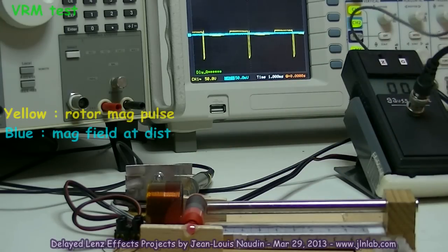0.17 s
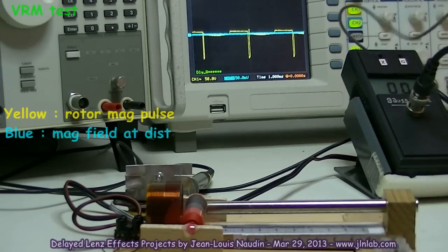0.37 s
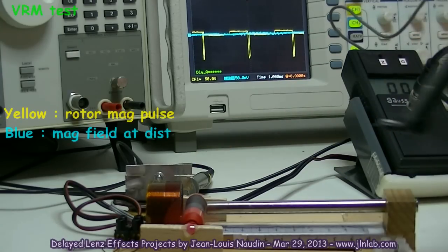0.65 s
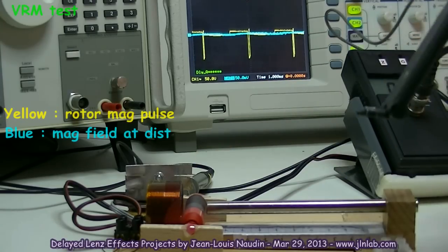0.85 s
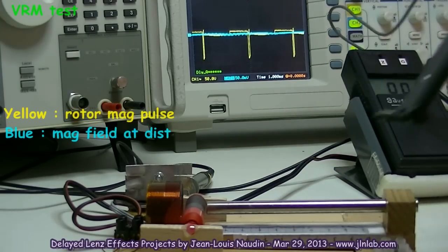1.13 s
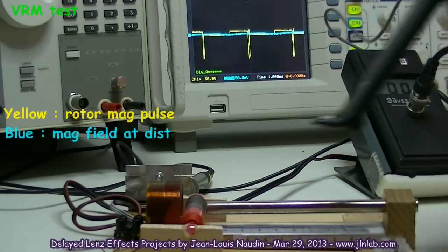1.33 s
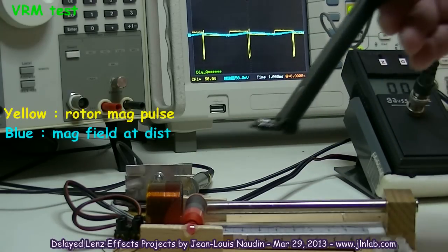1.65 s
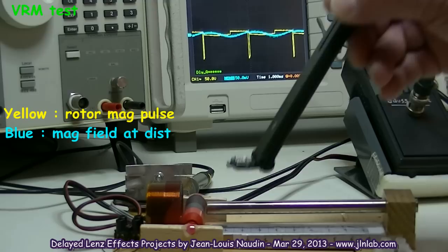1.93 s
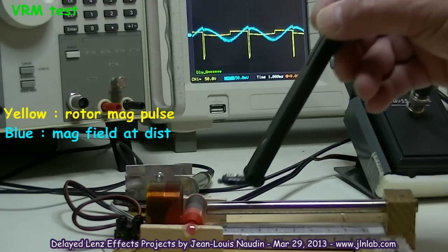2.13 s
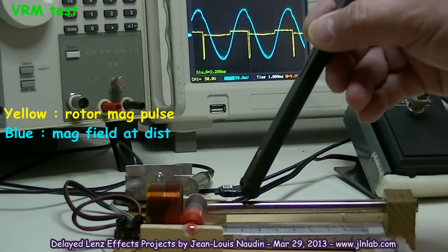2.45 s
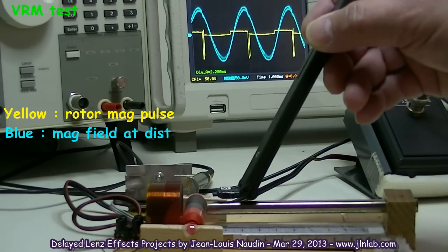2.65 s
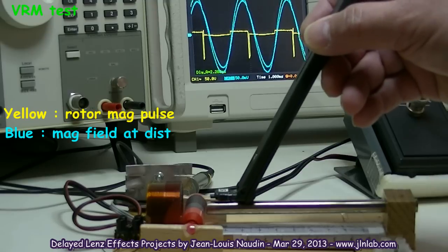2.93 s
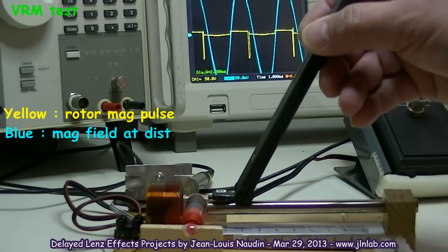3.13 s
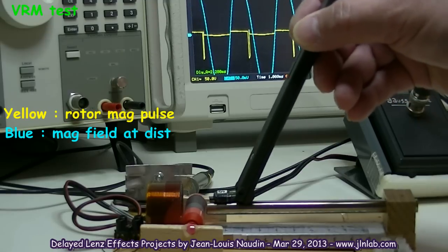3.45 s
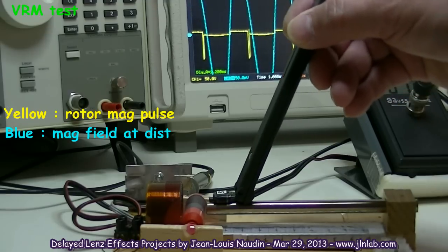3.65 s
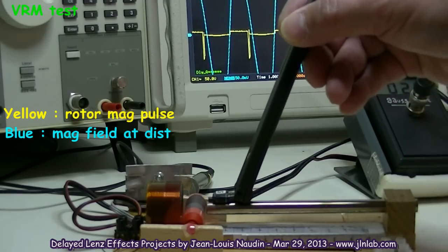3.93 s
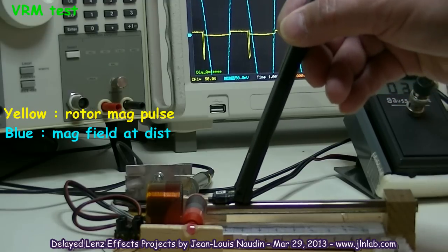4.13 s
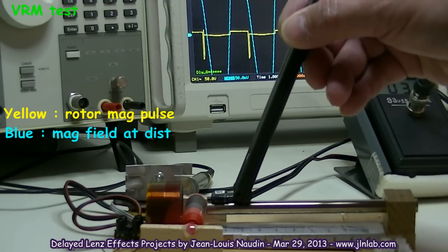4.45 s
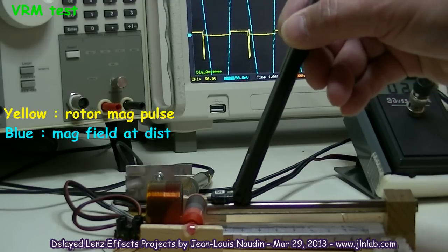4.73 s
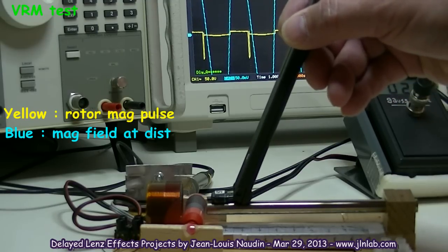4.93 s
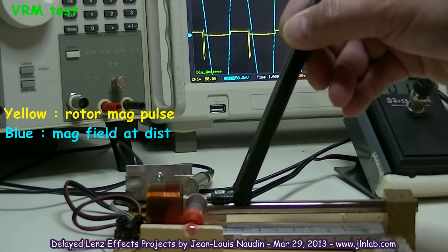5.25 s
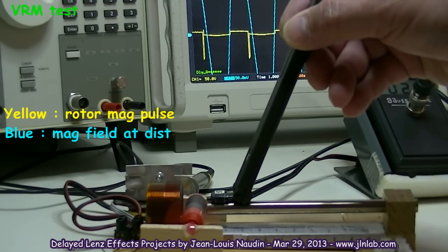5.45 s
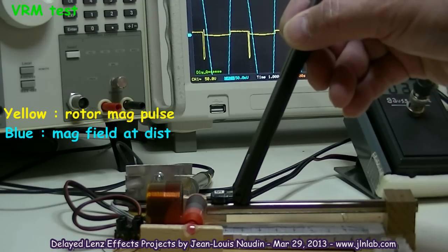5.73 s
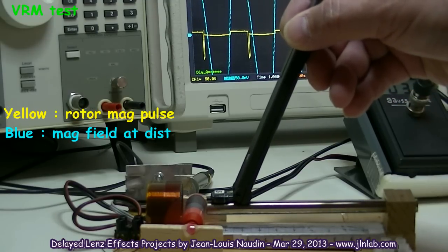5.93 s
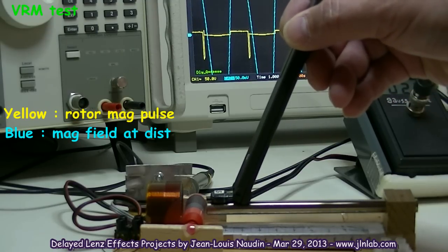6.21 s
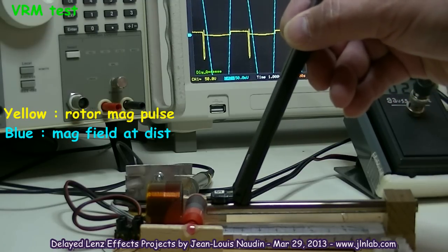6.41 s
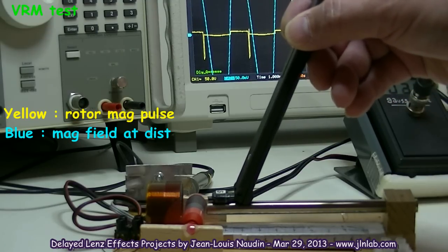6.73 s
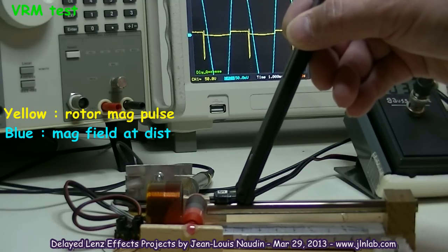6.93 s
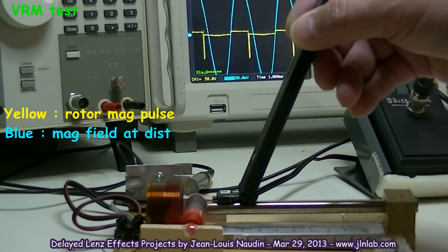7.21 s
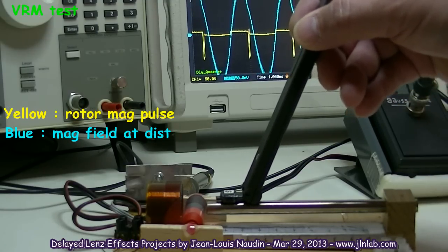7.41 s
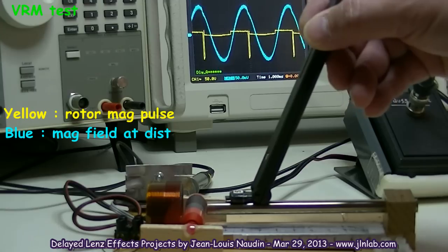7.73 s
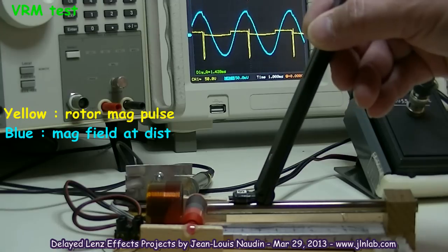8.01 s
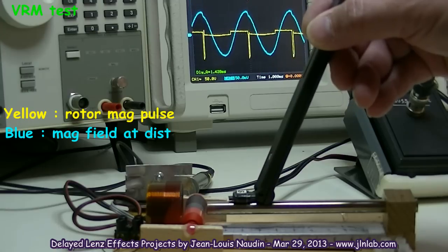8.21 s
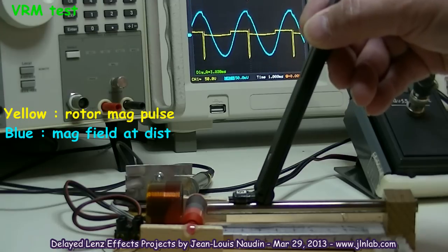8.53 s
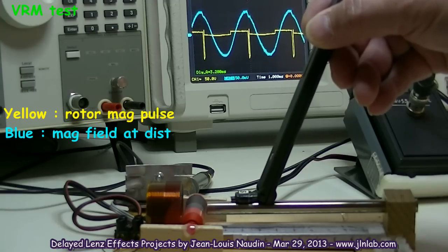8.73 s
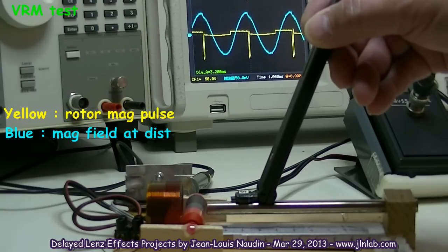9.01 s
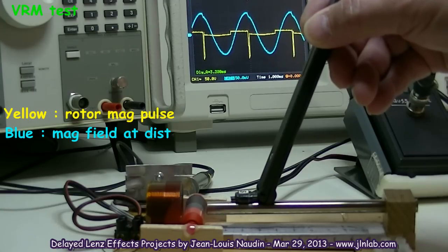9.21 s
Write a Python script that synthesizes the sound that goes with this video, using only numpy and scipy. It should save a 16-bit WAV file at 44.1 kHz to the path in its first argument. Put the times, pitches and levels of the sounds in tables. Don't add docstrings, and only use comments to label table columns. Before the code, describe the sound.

A tiny rotor spins very fast on a workbench, already running from the start, giving a steady nasal whine full of bright buzzing overtones over airy hiss. Around three seconds a hand-held probe touches a metal rail with a hard squeaky clack and two or three short chattering taps. The whine then continues, its tone shifting slightly until the end. Close microphone, dry indoor sound, nearly centred.

```python
import sys
import numpy as np
from scipy import signal
from scipy.fft import rfft, irfft, next_fast_len
from scipy.io import wavfile
from scipy.ndimage import uniform_filter1d

SR = 44100
rng = np.random.default_rng(int(sys.argv[2]) if len(sys.argv) > 2 else 0)


def pcm_store(signal):
    levels = np.round(np.clip(np.atleast_2d(signal), -1, 1) * 32767)
    wavfile.write(sys.argv[1], SR, levels.astype(np.int16).T)


def ratio(d):
    e = np.asarray(d, float) / 20
    return 10 ** e


N = 412776
T = np.arange(N) / SR
SLOW = T[::64]

# start_s, turns_per_s [Hz]
SHAFT_SPEED = [(0.1, 207.1), (2.39, 207.8), (3.08, 207.3), (3.13, 207.7), (4.51, 207.9), (4.61, 207.4),
               (5.09, 208.1), (5.4, 207.5), (5.71, 208.6), (6.29, 208.1), (6.4, 208.7), (7.92, 208.3),
               (8.15, 208.9), (8.28, 208.0), (8.58, 208.7), (9.25, 208.6)]


def shaft_angle(hunt_hz=0.1, hunt_per_s=7):
    speed_hz = curve(SHAFT_SPEED, T) + hunt_hz * walk(hunt_per_s)
    return 2 * np.pi * np.cumsum(speed_hz) / SR


def rotor(turn, top_order=64):
    phase_scatter, sway_rad = 0.085, 0.01
    plank_hz, plank_width_hz = 1500, 150
    orders = np.arange(1, top_order + 1)
    hz = orders * np.mean(curve(SHAFT_SPEED, SLOW))
    lead = np.where(orders < 15, 1.11 - 0.18 * orders, 0.07)
    scatter = phase_scatter * rng.standard_normal(top_order) * (orders > 14)
    phase = 2 * np.pi * (np.cumsum(lead) - lead + scatter)
    phase -= np.arctan(2 * (hz - plank_hz) / plank_width_hz)
    size = np.sqrt(2) * ratio(order_levels(hz))
    step = np.exp(1j * (turn + sway_rad * walk(30)))
    power = np.ones(N, complex)
    out = np.zeros(N)
    for k in range(top_order):
        power = power * step
        out -= np.interp(T, SLOW, size[k]) * (power * np.exp(1j * phase[k])).real
    return out


# start_s, level_db [dB]
KNOCK = [(0.0, -43.5), (0.8, -43), (0.88, -44.5), (1.17, -43), (1.25, -45), (2.61, -42.5), (2.66, -44.5),
         (2.82, -43), (3.02, -44), (4.04, -44), (6.78, -42), (7.4, -43.5), (8.13, -41.5), (8.26, -43),
         (8.99, -41.5), (9.36, -41.5)]


def order_levels(hz):
    knock_db = curve(KNOCK, SLOW)
    db = bearing_orders(hz)
    db[10:] += knock_db
    db[:10] += np.mean(knock_db)
    return rail_bends(db)


# start_s, seat [0-3, beyond 3 is held at 3]
SETTLING = [(0, 0.5), (.88, 1.3), (1.42, 1.05), (2.0, 1.5), (2.15, 1.83), (4.15, 2), (5.45, 2.5), (6.37, 5),
            (8.22, 2.7), (8.45, 6)]
JUMP_S = 0.033
# order, then level_db above the knock [dB] in seats 0, 1, 2 and 3
SEATS = [(5, -21, -16.5, -21, -17.5), (6, -11, -11.5, -10, -11.5), (7, -5.5, -6.5, -8.5, -5.5),
         (8, -10, -14, -18.5, -17.5), (9, -14, -25, -26, -24), (10, -31, -19, -19.5, -21),
         (11, -19, -11.5, -19, -40), (12, -14.5, -13.5, -13.5, -15.5), (13, -19, -17, -13.5, -20.5),
         (14, -10, -18, -15.5, -13), (15, -11, -18, -15, -10.5), (16, -22, -11.5, -14.5, -7),
         (17, -6, -3, -4.5, -6.5), (18, -11, -11.5, -9, -8), (19, -10, -16, -8.5, -11.5),
         (20, -7.5, -11, -12, -13.5), (21, -17, -24, -23, -30), (22, -29, -26, -16, -12.5),
         (23, -22, -23, -9.5, -15), (24, -18, -13.5, -29, -34), (25, -15, -17.5, -24, -28),
         (26, -24, -18.5, -17.5, -30.5), (27, -29, -26, -32, -24), (28, -31, -30, -26, -27.5)]
# centre_hz [Hz], width_hz [Hz], level_db in seat 0 [dB], in seat 3 [dB]
CAGE = [(6140, 520, -20.5, -37.5), (7180, 430, -38, -32.5), (7950, 350, -30, -35), (8430, 170, -41, -32.5),
        (9490, 410, -45, -30), (10540, 700, -43, -40), (12500, 1200, -47, -45)]


def bearing_orders(hz, wander_db=1.0):
    cage_scatter_db, twitch_db = 3.5, 1.36
    firm_db = 13.5
    seat = np.clip(held(SETTLING, JUMP_S), 0, 3)
    share = np.arange(4) / 3
    cage = sum(ratio(first + (last - first) * share) * ring(hz[:, None], f, w) ** 2
               for f, w, first, last in CAGE)
    seats = 20 * np.log10(cage) + cage_scatter_db * rng.standard_normal(cage.shape)
    for row in SEATS:
        seats[round(row[0]) - 1] = row[1:]
    db = np.array([np.interp(seat, np.arange(4), row) for row in seats])
    weak = np.clip(-db / firm_db, 0.4, 1.6)
    loose = np.minimum(np.sqrt(hz[:, None] / 4000) * weak, 1.7)
    wander = np.array([walk(5, SLOW) for f in hz])
    return db + loose * (wander_db * wander + twitch_db * twitch(len(hz)))


def twitch(count, per_s=7):
    at = np.cumsum(rng.exponential(1, 200)) / per_s
    steps = rng.standard_normal((count, 201))
    steps = uniform_filter1d(steps, size=2, axis=0) * np.sqrt(2)
    return uniform_filter1d(steps[:, np.searchsorted(at, SLOW)], size=12, axis=1)


# start_s, pressure [0-1, more is a hard push]
GRIP = [
    (0, 0.12),
    (3.09, 1.7),
    (3.14, 1.),
    (3.225, 1.8),
    (3.275, 0.15),
    (3.485, 0.98),
    (4.3, 0.9),
    (5.4, 0.4),
    (6.4, 0.5),
]
GRIP_S = 0.013
# order, free_db [dB], pressed_db [dB], most pressure felt [same scale]
BENDS = [(1, -76.5, -80.5, 0.91), (3, -60, -67, 2.7), (4, -54, -50.5, 1.34)]
# start_s, level_db [dB]
SECOND_BEND = [(0, -62.5), (.9, -63), (1.5, -71.5), (3.04, -74.5), (3.08, -68), (3.51, -66.5), (3.55, -73),
               (3.8, -78), (4.15, -71), (4.3, -67), (7.2, -64), (7.75, -68.5), (9.36, -64.5)]
# order, added_db [dB]
SHAKE = [(3, 4.7), (7, 8.4)]
SHAKE_SHARE = [0.82, .3, 0.8, .2]
# start_s, length_s, squeak_db [dB], rod_db [dB], tip_db [dB]
CHATTER = [
    (2.867, 0.074, -46, -50.5, -42.5),
    (3.035, 0.044, -53, -55.5, -56),
    (3.28, 0.045, -51, -60, -48),
    (3.46, .04, -68, -66, -60),
]


def rail_bends(db, late_s=0.015):
    grip = held(GRIP, GRIP_S)
    db[1] = curve(SECOND_BEND, SLOW)
    for order, free_db, pressed_db, most in BENDS:
        db[round(order) - 1] = free_db + (pressed_db - free_db) * np.minimum(grip, most)
    shake = np.zeros(len(SLOW))
    for share, (start, length, *_) in zip(SHAKE_SHARE, CHATTER):
        begin = start + late_s
        shake += share * held([(0, 0), (begin, 1), (start + length + late_s, 0)], GRIP_S)
    for order, added_db in SHAKE:
        db[round(order) - 1] += added_db * shake
    return db


# centre_hz [Hz], width_hz [Hz], level_db [dB]
ROD = [(700, 180, 2), (875, 120, -13), (1450, 210, -4), (1647, 68, 4)]
# centre_hz [Hz], width_hz [Hz], level_db [dB]
TIP = [(3070, 350, 2), (3620, 320, 1), (4600, 890, -5), (6200, 1700, -17)]


def probe(edge_s=0.0043):
    squeak_hz, waver_hz, rough_db, grit_db = 1398, 10, 1.0, 3.0
    squeak_fade_db_s, tip_fade_db_s = 120, 110
    rod = coloured(lambda hz: sum(ratio(db) * ring(hz, f, w) ** 2 for f, w, db in ROD) * hz / (hz + 600))
    tip = coloured(lambda hz: sum(ratio(db) * ring(hz, f, w) ** 2 for f, w, db in TIP))
    tip = tip * ratio(grit_db * walk(350))
    flutter = ratio(rough_db * walk(44))
    squeak_phase = 2 * np.pi * np.cumsum(squeak_hz + waver_hz * walk(40)) / SR
    squeak = np.sqrt(2) * np.sin(squeak_phase)
    out = np.zeros(N)
    for start, length, squeak_db, rod_db, tip_db in CHATTER:
        land = np.clip((T - start) / edge_s, 0, 1)
        lift = np.clip((start + length - T) / (2 * edge_s), 0, 1)
        since = np.clip(T - start, 0, 1)
        sound = ratio(squeak_db - squeak_fade_db_s * since) * squeak
        sound += ratio(rod_db) * rod
        sound += ratio(tip_db - tip_fade_db_s * since) * tip
        out += land * lift * sound
    return filtered(out * flutter, lambda hz: hz ** 2 / (hz ** 2 + 350 ** 2))


# frequency_hz [Hz], level_db [dB per Hz]
HISS = [(60, -53), (100, -38.5), (200, -31.5), (400, -18.5), (800, -11.5), (1900, -9.5), (2700, -7),
        (3400, -2.5), (4500, -6.5), (5300, -11), (7500, -22), (9300, -19.5), (11500, -26), (15500, -35)]
# centre_hz [Hz], width_hz [Hz], added_db [dB]
HISS_RINGS = [(3720, 330, -3), (4174, 60, 4), (8300, 260, 5.5)]


def hiss(turn):
    level_db, follow = -49.5, 0.067
    gust, gust_at_rad = 0.2, -0.53
    calm = 0.18
    air = coloured(lambda hz: ratio(on_log_hz(HISS, hz)
                                  + sum(db * ring(hz, f, w) ** 2 for f, w, db in HISS_RINGS)))
    treble = filtered(air, lambda hz: hz ** 2 / (hz ** 2 + 2500 ** 2))
    last_seat = np.clip(np.interp(T, SLOW, held(SETTLING, JUMP_S)) - 2, 0, 1)
    rattle = filtered(air, lambda hz: ring(hz, 3650, 690) ** 2)
    air = air - calm * last_seat * rattle
    air = air + gust * np.cos(turn - gust_at_rad) * treble
    knock_db = curve(KNOCK, T)
    drift_db = 0.29 * walk(5.1) + 0.54 * walk(11)
    return air * ratio(level_db + follow * (knock_db - np.mean(knock_db)) + drift_db)


def mains_hum(hz=100, level_db=-103):
    return np.sqrt(2) * ratio(level_db) * np.sin(2 * np.pi * hz * T)


# frequency_hz [Hz], side_minus_mid_db [dB]
SIDE_DB = [(60, -3), (130, -28), (250, -18.5), (700, -28.5), (1300, -34), (2400, -22.5), (3600, -22),
           (5500, -22.5), (8100, -19.5), (10500, -23.5), (15000, -25)]
# frequency_hz [Hz], angle_rad [rad]
SIDE_ANGLE = [(200, 2), (1300, 1.3), (2400, 1.9), (3100, 3.1), (3700, 2.3), (5000, 1.1), (8000, 0.85),
              (12000, 1.7)]


def two_ports(mid):
    side = filtered(mid, lambda hz: ratio(on_log_hz(SIDE_DB, hz)) * np.exp(1j * on_log_hz(SIDE_ANGLE, hz)))
    side = side + ratio(-63.5) * coloured(lambda hz: ratio(on_log_hz(HISS, hz) + on_log_hz(SIDE_DB, hz)))
    return np.array([mid + side, mid - side])


def ring(hz, centre_hz, width_hz):
    return 1 / np.sqrt(1 + (2 * (hz - centre_hz) / width_hz) ** 2)


def filtered(x, gain_at):
    size = next_fast_len(N)
    hz = np.arange(size // 2 + 1) * SR / size
    return irfft(rfft(x, size) * gain_at(hz), size)[:N]


def coloured(gain_at):
    x = filtered(rng.standard_normal(N), gain_at)
    return x / x.std()


def on_log_hz(table, hz):
    f, value = np.transpose(table)
    return np.interp(np.log(np.maximum(hz, 1)), np.log(f), value)


def walk(rate, t=T):
    return np.interp(t * rate, np.arange(4000), rng.standard_normal(4000))


def held(table, edge_s):
    s, v = np.transpose(table)
    steps = np.clip((SLOW - s[1:, None]) / max(edge_s, 0.001) + 0.5, 0, 1)
    return v[0] + np.diff(v) @ steps


def curve(table, t):
    return np.interp(t, *np.transpose(table))


def scene():
    turn = shaft_angle()
    return two_ports(rotor(turn) + probe() + hiss(turn) + mains_hum())


def top_cut(x):
    return signal.sosfilt(signal.butter(12, 15640, fs=SR, output="sos"), x)


def record(dry):
    return top_cut(dry)


dry = scene()
out = record(dry)
pcm_store(out)
```